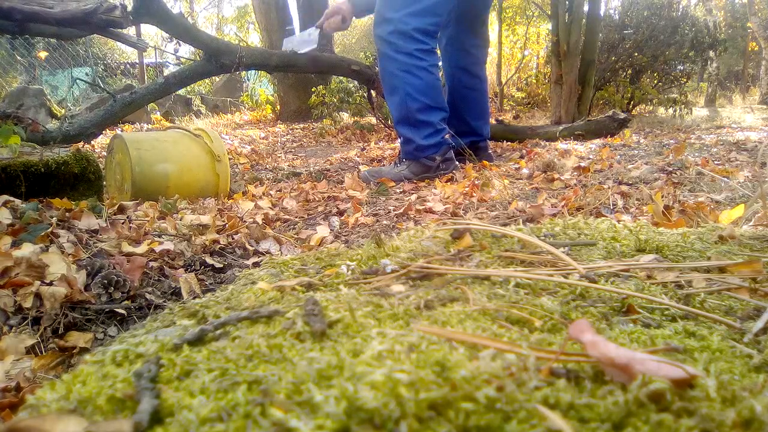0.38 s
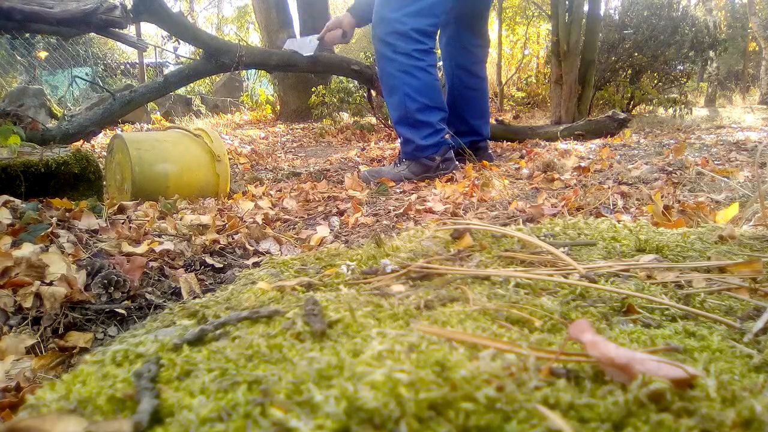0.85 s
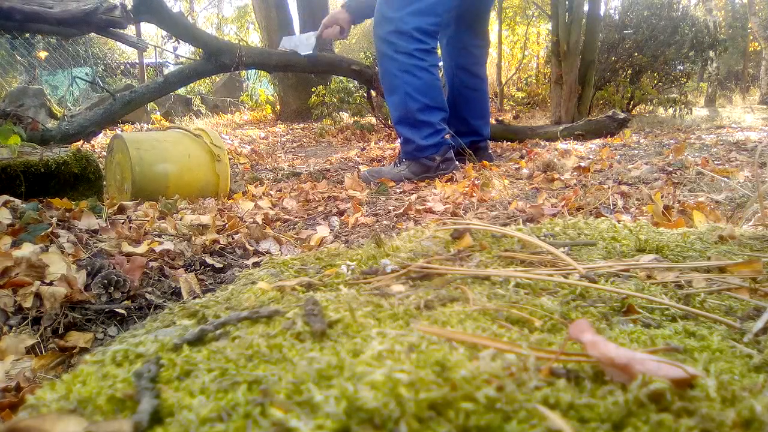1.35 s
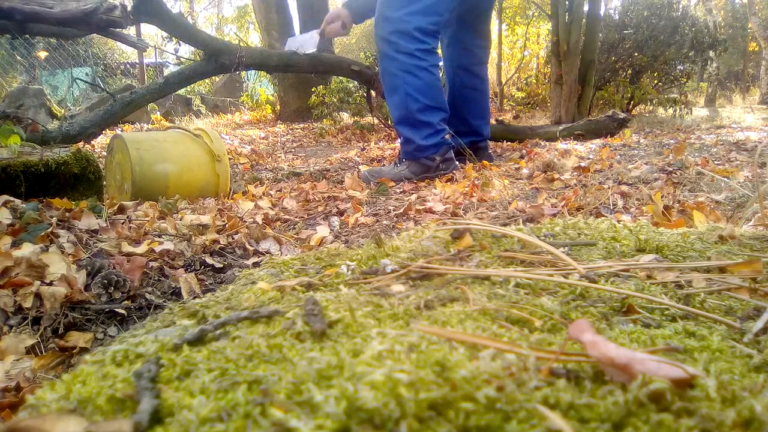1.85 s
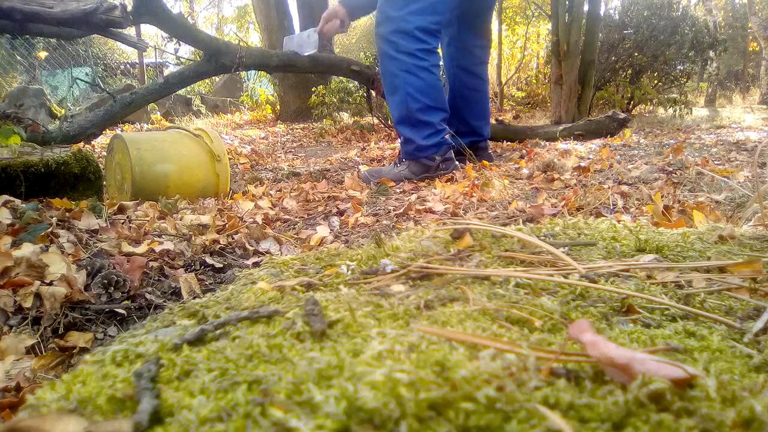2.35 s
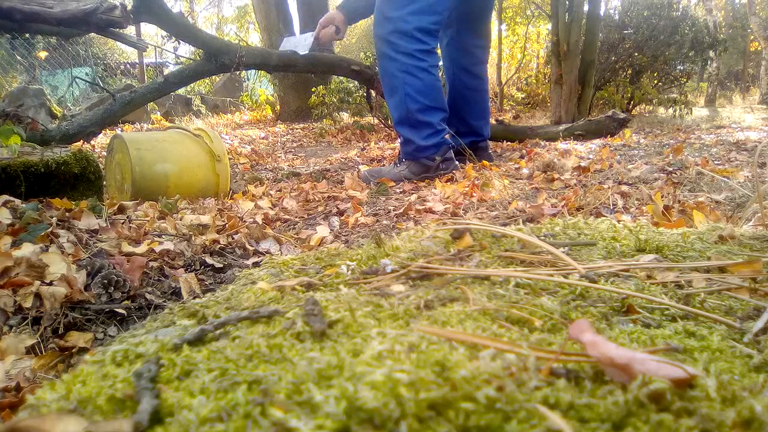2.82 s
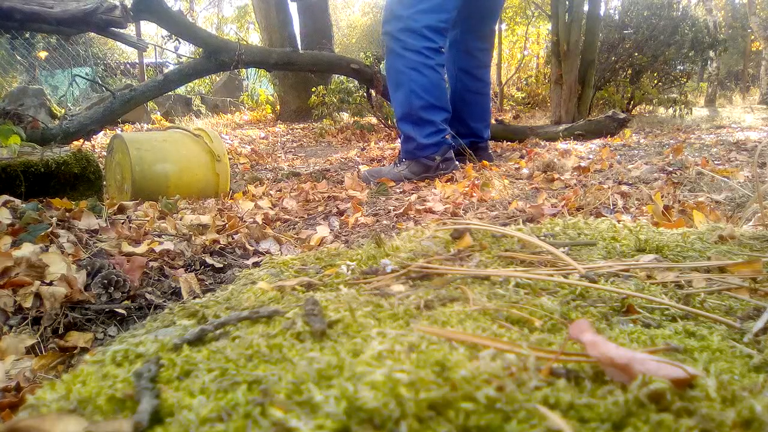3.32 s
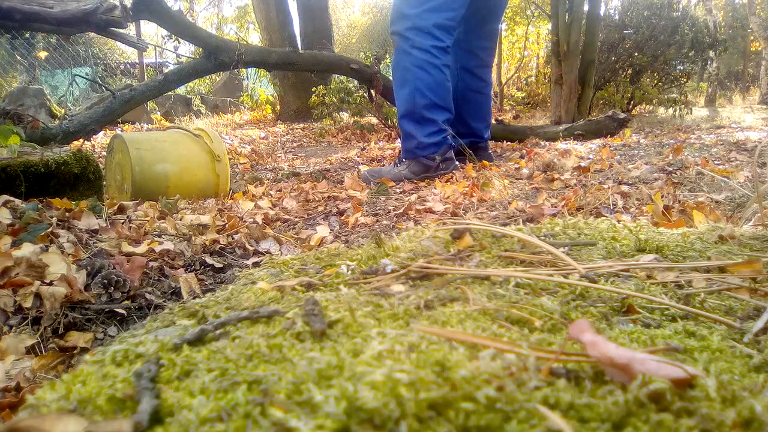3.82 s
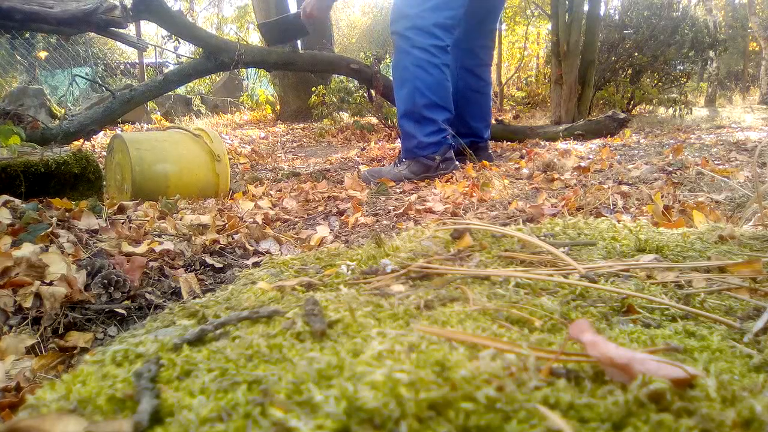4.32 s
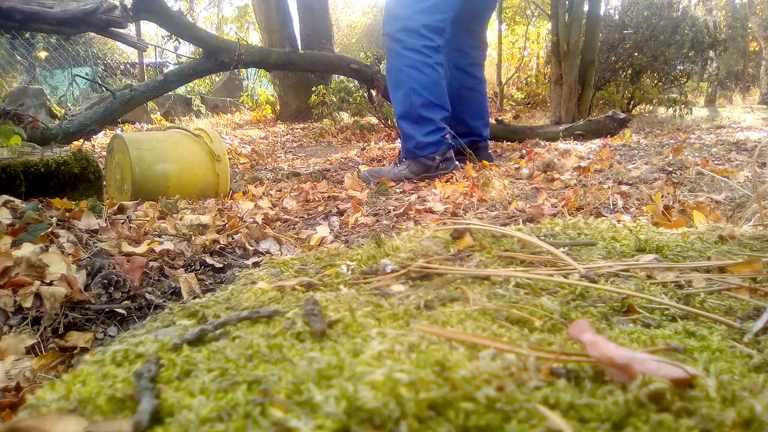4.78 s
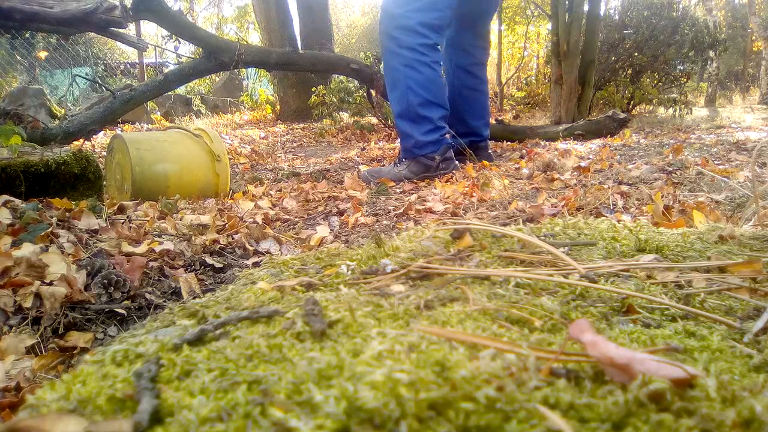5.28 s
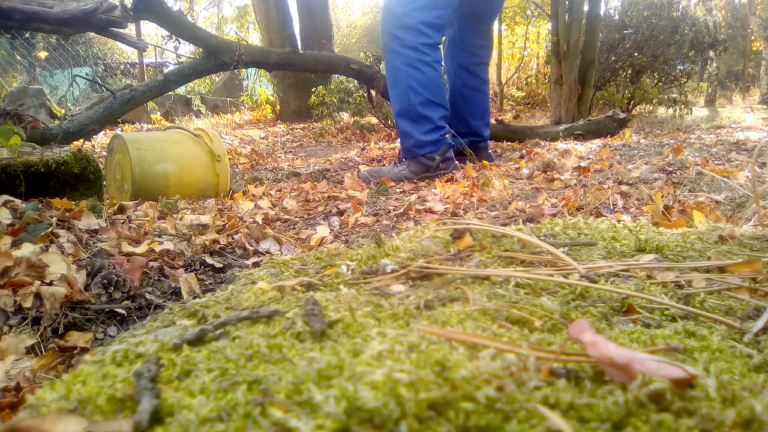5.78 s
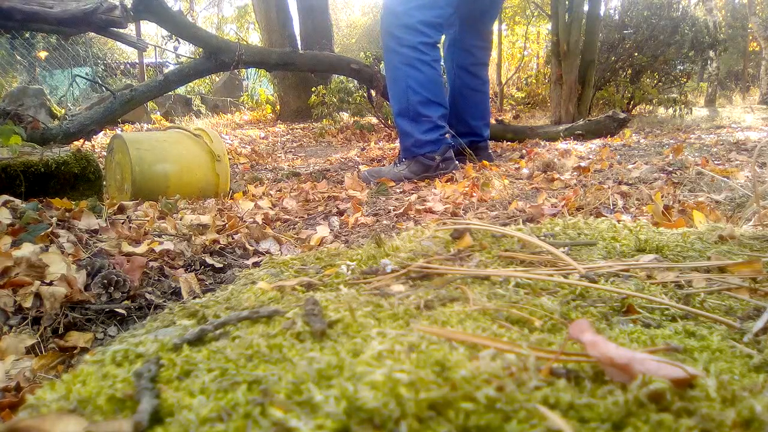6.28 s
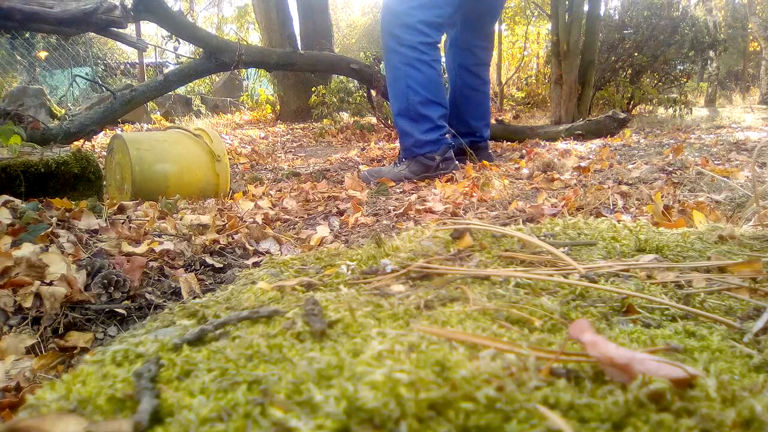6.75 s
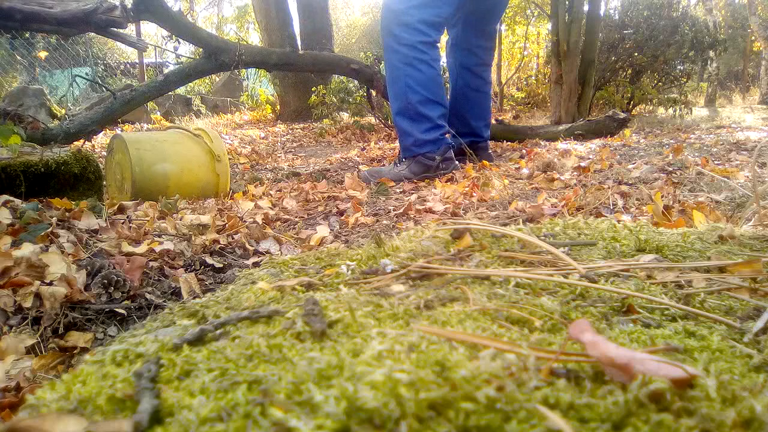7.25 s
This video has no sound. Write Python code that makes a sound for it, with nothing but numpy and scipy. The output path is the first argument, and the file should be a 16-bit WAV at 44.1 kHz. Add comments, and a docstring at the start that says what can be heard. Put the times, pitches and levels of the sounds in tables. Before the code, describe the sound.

Hard, dry chopping outdoors: six evenly spaced knocks with splintering edges and short, diffuse reflections, then a pause where debris patters and litter settles, then five further knocks, uneven in force. The blade rings thinly and briefly, most noticeably at the restart. Leaves rustle softly after each hit. A low, stationary microphone several steps away hears a steady quiet hiss, and soft low wind thumps grow during the second run.

```python
"""In a garden, a steel cleaver chops a hard dry branch: six strokes, a pause, five more.
The wood knocks through its bending modes, the blade rings briefly as decaying sines, and
trees and fences scatter the blow as decaying noise. Chips and twigs tick into dry leaves, the
litter crackles as sparse clicks, and a light wind, low noise, starts to buffet the microphone
near the moss over a steady hiss."""
import sys
import numpy as np
from scipy import signal
from scipy.fft import rfft, irfft
from scipy.io import wavfile
from scipy.ndimage import uniform_filter1d

SR = 44100
rng = np.random.default_rng(int(sys.argv[2]) if len(sys.argv) > 2 else 0)


def transcribe(u):
    """Save the signal u as a 16-bit wav file named by the first command-line argument.

    u: samples, shape (n,) or (channels, n), limited to [-1, 1]; the rate is SR.
    q: integer samples, one column per channel.
    """
    v = np.clip(np.atleast_2d(u).T, -1, 1)
    q = np.round(v * 32767).astype(np.int16)
    wavfile.write(sys.argv[1], SR, q)


def ratio(d):
    """dB to gain"""
    e = np.asarray(d, float) / 20
    return 10 ** e


N = 325458  # length [samples]


def evened(x):
    """Scales a signal to rms 1."""
    return x / np.sqrt(np.mean(x ** 2) + 1e-20)


def read(points, hz, column=1):
    """Reads a column of a table at any frequency, interpolating over log frequency."""
    table = np.transpose(points)
    return np.interp(np.log(hz + 1), np.log(table[0] + 1), table[column])


def curve(rows):
    """Joins (time, level) points by straight lines over the whole scene."""
    s, value = np.transpose(rows)
    return np.interp(np.arange(N) / SR, s, value)


def add(mix, s, sound):
    """Adds a sound into the mix at time s, cut at the end of the mix."""
    part = mix[round(s * SR):][:len(sound)]
    part += sound[:len(part)]


def coloured(x, points):
    """Filters x by a spectrum and scales to rms 1."""
    hz = np.fft.rfftfreq(len(x), 1 / SR)
    return evened(irfft(rfft(x) * ratio(read(points, hz)), len(x)))


def ring(hz, t60, size=9000):
    """One mode: a sine that falls 60 dB in t60 seconds."""
    t = np.arange(size) / SR
    return ratio(-60 * t / t60) * np.sin(2 * np.pi * hz * t)


def grains(size, spread_db, per_s):
    """Sparse clicks of uneven size, a few of them large."""
    height = ratio(spread_db * np.minimum(rng.exponential(1, size), 4))
    return height * rng.choice([-1., 1.], size) * (rng.random(size) < per_s / SR)


def wobble(size, samples):
    """Noise smoothed twice over a number of samples, rms 1."""
    smooth = uniform_filter1d(rng.standard_normal(size), samples)
    return evened(uniform_filter1d(smooth, samples))


# The cleaver's strokes; splintering and chatter are against the knock:
# (time [s], knock level [dB], knock pitch [Hz], splintering level [dB], chatter level [dB])
BLOWS = [(0.443, -8, 1700, -11, -11.5), (0.9408, -10.5, 1480, -6, -22.5), (1.4388, -6, 1653, -16.5, -8.5),
         (1.92, -10, 1654, -10.5, -18), (2.4107, -7, 1296, -10, -15.5), (2.9035, -6, 1750, -17, -10.5),
         (5.1278, -9.5, 1798, -13, -1.5), (5.6021, -11.5, 1540, -7, -20), (6.0642, -14, 1700, -6.5, -27.5),
         (6.5219, -7.5, 1670, -17, -12), (6.9829, -13, 1570, -12.5, -13)]


def strokes():
    """Every blow of the edge on the branch, with the leaves it shakes."""
    out = np.zeros(N)
    for s, *blow in BLOWS:
        add(out, s - .0015, chop(*blow))  # first contact comes a little early
        add(out, s, shaken_leaves(s))
    return out


# Splintering fibres, relative spectrum: (frequency [Hz], level [dB])
SPLINTER = [(900, -25), (2000, 5), (2800, 7), (3700, -13.5), (5000, -3.5), (6500, -2.5), (7800, -24.5),
            (12000, -28.5), (16000, -36)]
THUD_DB, SCATTER_DB = -12.5, -2.5  # relative weights of the thud and the scatter [dB]
THUD_DB_PER_CHATTER_DB = -0.43  # a chattering edge puts less into the low thud
STOP_S = 0.0024  # the edge halts this long after first contact [s]


def chop(db, hz, splinter_db, chatter_db):
    """The edge slips into the fibres, then stops dead; each jolt knocks the wood and the garden answers."""
    t = np.arange(4000) / SR
    thud_db = THUD_DB + THUD_DB_PER_CHATTER_DB * (chatter_db + 11)
    bite = np.where(t < STOP_S, np.exp((t - STOP_S) / 0.00064), np.exp((STOP_S - t) / 0.003))
    jolts = edge_jolts(bite, db, hz, chatter_db)
    knock = ring(hz, 0.007, size=len(t)) + ratio(-18.5) * ring(2780, 0.0052, size=len(t))
    body = knock + 0.19 * branch_thud(thud_db, len(t))
    direct = signal.fftconvolve(jolts, body)[:len(t)]
    direct += ratio(splinter_db) * bite * coloured(rng.standard_normal(len(t)), SPLINTER)
    out = np.pad(direct, (0, SR // 2))
    add(out, STOP_S, ratio(SCATTER_DB) * scatter(thud_db + 9, splinter_db + 7.5))
    return ratio(db) * out


SLIPS_DB = -17.5  # one level for the slips of all strokes [dB]


def edge_jolts(bite, db, hz, chatter_db):
    """Force pulses of the edge: the dead stop, small slips around it, and chatter on the way in."""
    jolts = signal.unit_impulse(len(bite), round(STOP_S * SR))
    # less db: the stroke's own level, applied later, cancels out
    jolts += ratio(SLIPS_DB - db) * bite * grains(len(bite), 1.2, 3000)
    cycles = np.arange(1, 4)  # counted back from the stop: harder each time towards it
    chatter_hz = max(hz, 3 / STOP_S)  # in step with the wood, fast enough to fit three cycles
    places = np.round((STOP_S - cycles / chatter_hz) * SR).astype(int)
    jolts[places] += ratio(chatter_db - 6.3 * cycles)
    return jolts


# Bending modes of the branch, relative levels: (frequency [Hz], level [dB], t60 [s])
WOOD = [(189, -21, 0.21), (290, -23, 0.03), (382, -12.5, .07), (411, -9, .06), (559, 4, 0.069),
        (655, 2.5, 0.035), (810, -3, 0.021), (1187, 9.5, 0.021)]
# Dull returns from a fence and trunks, against the thud: (delay [s], level [dB])
ECHOES = [(.0065, -12), (0.0135, -5), (.022, -6.5), (.036, -10.5)]


def branch_thud(thud_db, size):
    """The branch bends in its modes, and a fence and trunks return the thud dulled."""
    thud = ratio(thud_db) * sum(ratio(d) * ring(f, t60, size=size) for f, d, t60 in WOOD)
    echoed = np.pad(thud, (0, size))
    soft = signal.windows.hann(50)  # bark and leaves dull the echoes
    dull = np.convolve(thud, soft / soft.sum())
    for s, echo_db in ECHOES:
        add(echoed, s, ratio(echo_db) * dull)
    return echoed[:size]


# Scattering among trunks, relative levels:
# (frequency [Hz], early level [dB], early t60 [s], late level [dB], late t60 [s])
GARDEN = [(151, -10.5, 0.29, -27.5, 0.2), (300, -4.5, 0.2, -26, 0.26), (536, 7, 0.11, -27.5, 0.36),
          (1010, 1, 0.093, -30, 0.67), (1700, -11.5, 0.16, -36, 0.68), (2800, -15.5, 0.21, -35, 0.98),
          (3430, -16.5, 0.15, -31.5, 0.44), (5250, -10, 0.23, -30.5, .8), (6720, -13, .17, -29, 1),
          (8000, -31, 0.22, -45, 0.45), (15800, -39.5, .17, -50.5, 0.48)]


def scatter(low_db, high_db):
    """Dense scatter among trunks and hedges, a fast and a slow decay, tinted by thud and splinters."""
    hz, t, z = signal.stft(rng.standard_normal(SR // 2), SR, nperseg=256)
    db, t60, late_db, late_t60 = (read(GARDEN, hz, column=k)[:, None] for k in range(1, 5))
    tint = [(600, 0.6 * low_db), (1200, 0.01), (2500, 0.02), (4500, 0.77 * high_db)]
    tint_db = read(tint, hz)[:, None]
    grain_db = 2.8 * wobble(len(hz), 2)[:, None]  # each cut has its own uneven colour
    flutter_db = 2.5 * wobble(len(t), 2)  # single trunks stand out of the scatter
    early = ratio(db + grain_db - 60 * t / np.maximum(t60, .03))
    late = ratio(late_db - 60 * t / np.maximum(late_t60, .1))
    shaped = z * (early + late) * ratio(tint_db + flutter_db)
    tail = signal.istft(shaped, SR, nperseg=256)[1][:SR // 2]
    return tail * (1 - np.exp(-np.arange(len(tail)) / SR / 0.0054))


# Dry leaves, relative spectrum, shared with the settling litter: (frequency [Hz], level [dB])
LEAF = [(1500, -27), (3000, -3), (6000, 4), (7500, -9.5), (10000, -7.5), (15000, -11)]
SHAKE_DB, SHAKE_DB_PER_S = -37, -1.31  # before rise and fade; fewer leaves are left as it goes on


def shaken_leaves(s):
    """Leaves on the branch shake with a blow at time s: dense clicks that swell and fade."""
    t = np.arange(16000) / SR
    shake = (1 - np.exp(-t / 0.011)) * np.exp(-(t / 0.066) ** 1.2)
    clicks = grains(len(t), 1.6, 15000) * ratio(2.1 * wobble(len(t), 250))
    return ratio(SHAKE_DB + SHAKE_DB_PER_S * s) * shake * coloured(clicks, LEAF)


# How strongly a stroke rings the four blade modes, before wavering and hold:
# (time [s], level [dB], level [dB], level [dB], level [dB])
RINGING = [(0.443, -62.5, -76, -70.5, -57), (0.9395, -46, -85, -89, -85), (1.4369, -70, -75, -44, -78),
           (1.921, -59.5, -76, -80.5, -48.5), (2.9042, -78.5, -66.5, -56, -72.5),
           (5.126, -76, -28, -37.5, -38), (5.5998, -57, -73.5, -38.5, -59), (6.0657, -53.5, -75, -54, -74),
           (6.5225, -72, -67, -50, -58), (6.9808, -80.5, -79, -48.5, -76)]
# Modes of the steel: (frequency [Hz], t60 [s], rms wavering in the hand [dB])
BLADE = [(1050, .5, 6.), (1217, .22, 1.), (2862, .33, 5.5), (4866, .7, 1.5)]
# muffled while stuck in the wood, then free, then dropping: levels at the top mode, less for lower ones
STUCK_S, DROP_S, CHANGE_S = .06, 0.17, 0.0074  # [s]
STUCK_DB, FREE_DB, DROP_DB = -5, -1, -13.5  # [dB]


def blade():
    """The steel rings on after a stroke in decaying modes, wavering in the hand."""
    out, t = np.zeros(N), np.arange(16000) / SR
    turns_s = [STUCK_S, STUCK_S + CHANGE_S, DROP_S, DROP_S + CHANGE_S]
    hold_db = np.interp(t, turns_s, [STUCK_DB, FREE_DB, FREE_DB, DROP_DB])
    for s, *blade_db in RINGING:
        for db, (hz, t60, waver_db) in zip(blade_db, BLADE):
            mode_hold_db = hold_db * (hz / BLADE[-1][0]) ** 3
            level_db = db + waver_db * wobble(len(t), 200) + mode_hold_db
            add(out, s, ratio(level_db) * ring(hz, t60, size=len(t)))
    return out


# Chips and twigs landing: (time [s], level [dB], centre frequency [Hz], length of the rustle [s])
DROPS = [(0.713, -50.5, 8000, 0.027), (1.235, -47, 2150, 0.016), (1.3534, -50, 2650, 0.037),
         (1.41, -54, 12850, 0.096), (1.7047, -41.5, 7900, 0.018), (2.079, -50, 3000, 0.026),
         (2.109, -52, 9800, 0.015), (2.202, -54, 8400, 0.016), (2.364, -54.5, 8930, 0.04),
         (2.661, -51.5, 6070, 0.026), (3.1866, -51, 7300, 0.029), (3.219, -50.5, 8000, 0.018),
         (3.3437, -48, 5250, 0.041), (3.379, -52, 8000, 0.023), (3.476, -56, 8980, 0.014),
         (3.5102, -55, 8790, 0.03), (3.692, -58.5, 11800, 0.0082), (3.7873, -56.5, 9900, 0.015),
         (3.8651, -55.5, 5120, 0.019), (4.2188, -62, 10000, .012), (4.2889, -60, 9900, 0.012),
         (4.811, -63.5, 8520, 0.0057), (5.116, -56, 4830, .008), (5.8783, -60, 14340, 0.013),
         (6.2866, -55, 9800, 0.024), (6.3016, -50, 10800, 0.011), (6.7206, -56, 10800, 0.035),
         (6.9601, -45.5, 5370, 0.018), (7.113, -61, 12700, 0.012), (7.2525, -61, 7000, 0.019)]
# Width of a drop's band by its centre: (centre frequency [Hz], width [octaves])
SPREAD = [(2500, 0.59), (5200, 0.68), (8500, 1.05), (13000, 0.66)]
TICK_CYCLES = 4.7  # a tick decays over this many cycles of its pitch
STIR_DB, STIR_LEAD = -12.5, .3  # rustle against tick [dB]; its rise as a share of its length


def drops():
    """A tick where the chip lands and a short rustle of the leaves around it."""
    out, hz = np.zeros(N), np.fft.rfftfreq(6000, 1 / SR)
    t = np.arange(6000) / SR - .02  # the chip lands at zero
    for s, db, centre_hz, length in DROPS:
        octaves = np.log2((hz + 1) / centre_hz)
        band = np.exp(-(octaves / read(SPREAD, centre_hz)) ** 2)
        band *= ratio(3. * wobble(len(hz), 60))  # a chip has several small resonances
        noise = evened(irfft(rfft(rng.standard_normal(len(t))) * band))
        fade = np.exp(-np.maximum(t, 0) * centre_hz / TICK_CYCLES) * (t >= 0)
        tick = noise * fade * np.linalg.norm(fade) / np.linalg.norm(noise * fade)
        stir = np.exp(-abs(t) / np.where(t < 0, STIR_LEAD, 1) / max(length, .002))
        crackle = ratio(4. * wobble(len(t), 60))
        rustle = ratio(STIR_DB) * noise * stir * crackle
        add(out, s - .02, ratio(db) * (tick + rustle))
    return out


SETTLE_DB, SETTLE_DB_PER_S = -63, -1.5  # level before rise and fade [dB], its change [dB/s]
SETTLE_RISE_S, SETTLE_FADE_S = .15, .45  # time constants [s]


def leaves():
    """Fine crackle in clumps as the litter settles after each blow."""
    level, t = np.zeros(N), np.arange(2 * SR) / SR
    swell = (1 - np.exp(-(t / SETTLE_RISE_S) ** 2)) * np.exp(-t / SETTLE_FADE_S)
    for s, *_ in BLOWS:
        add(level, s, ratio(SETTLE_DB + SETTLE_DB_PER_S * s) * swell)
    clumps = ratio(3.5 * wobble(N, 400))
    return level * coloured(grains(N, 3.8, 2000) * clumps, LEAF)


# Wind at the microphone: (time [s], level [dB])
WIND = [(0, -74), (4.9, -74), (5.1, -67), (5.44, -72), (5.56, -58), (5.72, -64.5), (5.79, -51.5),
        (5.84, -60), (6.24, -56), (6.31, -55), (6.49, -53.5), (6.74, -60), (6.776, -46.5), (6.82, -59.5),
        (6.95, -55), (7.08, -45.5), (7.16, -56), (7.21, -57), (7.38, -52.5)]
# Buffeting, relative spectrum: (frequency [Hz], level [dB])
GUST = [(20, -23.5), (45, -19.5), (85, -5), (125, -4), (165, -2.5), (240, -11), (320, -22), (480, -36.5),
        (800, -72.5)]


def wind():
    """Low lumpy buffeting at the microphone: low noise with an uneven level."""
    lumps = ratio(1.5 * wobble(N, 900))
    buffeting = evened(coloured(rng.standard_normal(N), GUST) * lumps)
    return ratio(curve(WIND)) * buffeting


# Far hiss, relative spectrum: (frequency [Hz], level [dB])
AIR = [(150, -32), (250, -0.5), (583, -3), (635, -3), (781, -5.5), (1730, -5.5), (1990, -8), (6210, -8.5),
       (8180, -21), (14700, -21), (15500, -16.5)]
AIR_DB = -70  # rms level of the hiss [dB]


def air():
    """Steady far hiss of the garden and the microphone: coloured noise."""
    return ratio(AIR_DB) * coloured(rng.standard_normal(N), [(100, -34.5)] + AIR)


def scene():
    """The chopping, its debris and the hiss, with the wind on the microphone."""
    heard = strokes() + blade() + drops() + leaves() + air()
    no_bass = signal.butter(4, 140, "high", fs=SR, output="sos")  # thin wood radiates no deep bass
    return (signal.sosfilt(no_bass, heard) + wind())[None]


def band_limit(x):
    """A steep low-pass at the top of the band."""
    return signal.sosfilt(signal.butter(12, 16500, fs=SR, output="sos"), x)


def record(dry):
    """Band-limits the scene at 15.75 kHz and finishes the mix."""
    edge = signal.firwin(511, 15750, fs=SR)
    mix = signal.oaconvolve(dry, edge[None], "same")
    return band_limit(mix)


dry = scene()
out = record(dry)
transcribe(out)
```